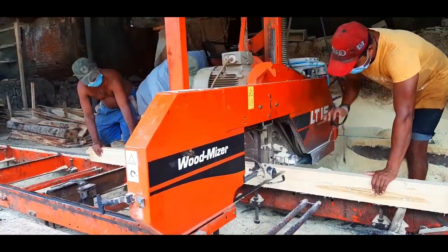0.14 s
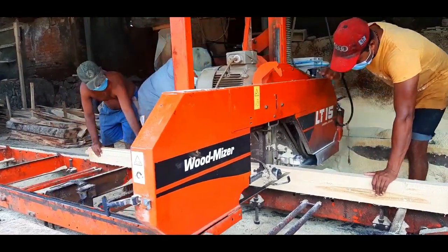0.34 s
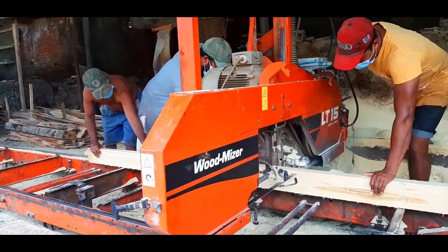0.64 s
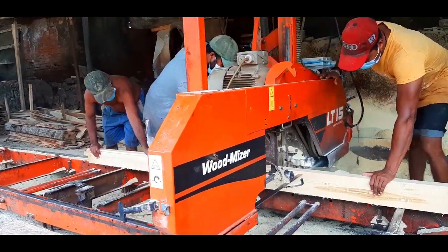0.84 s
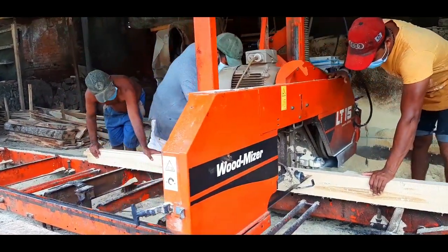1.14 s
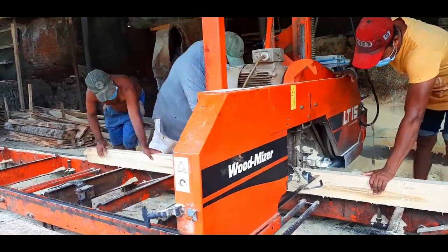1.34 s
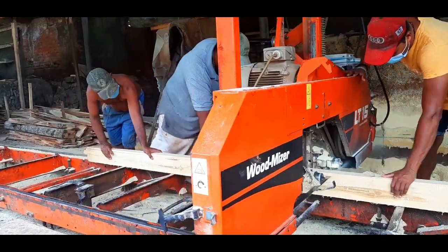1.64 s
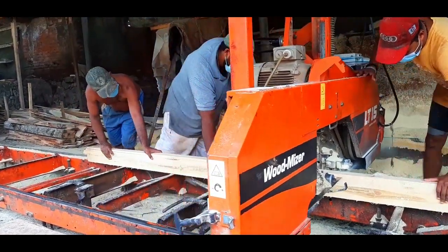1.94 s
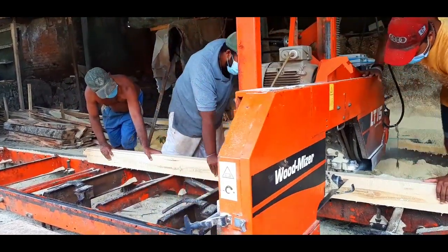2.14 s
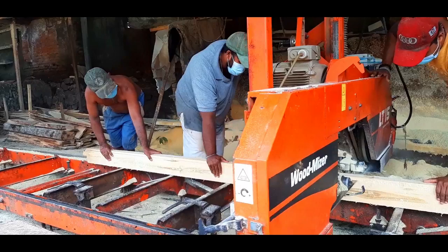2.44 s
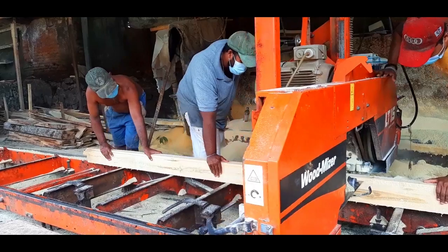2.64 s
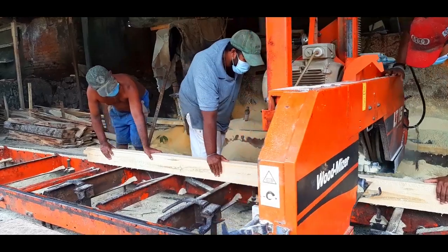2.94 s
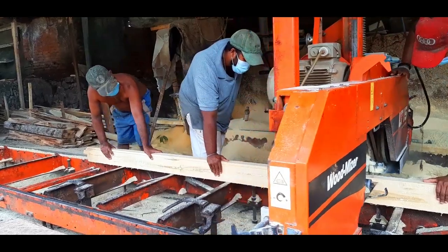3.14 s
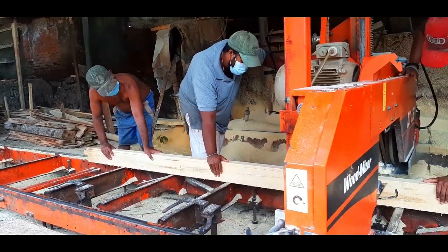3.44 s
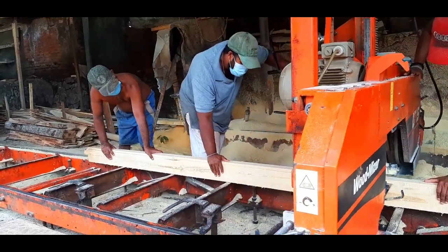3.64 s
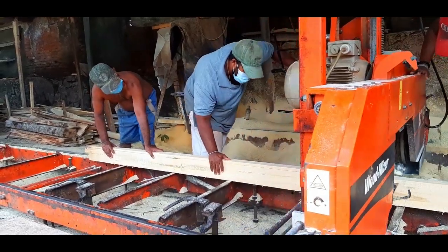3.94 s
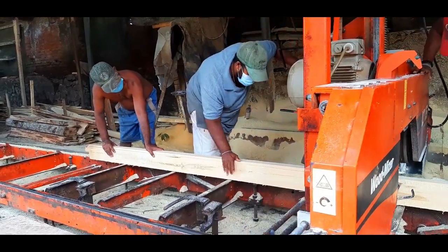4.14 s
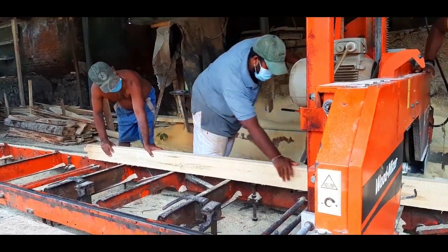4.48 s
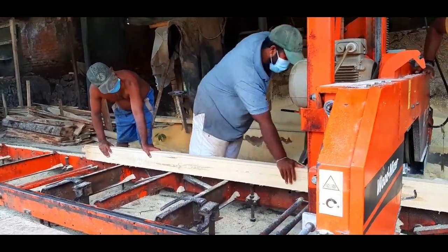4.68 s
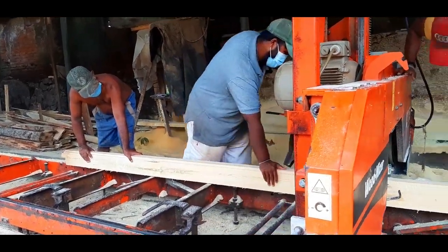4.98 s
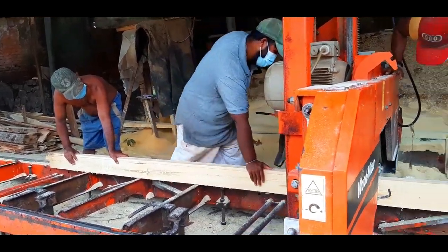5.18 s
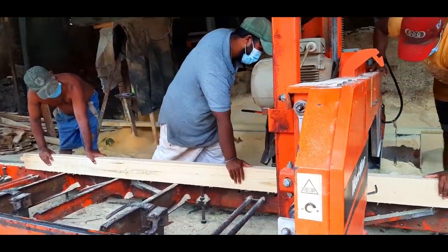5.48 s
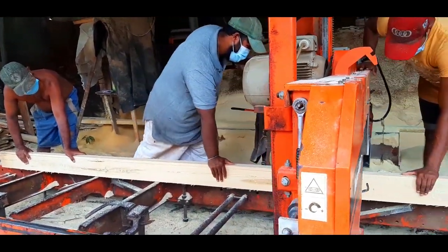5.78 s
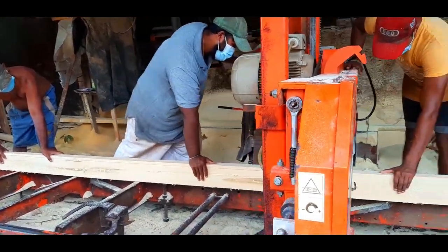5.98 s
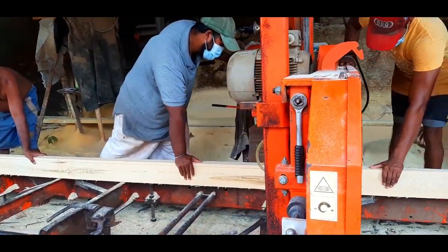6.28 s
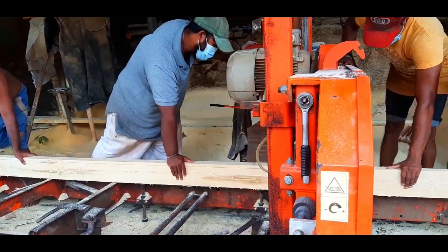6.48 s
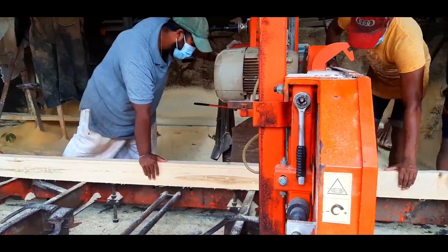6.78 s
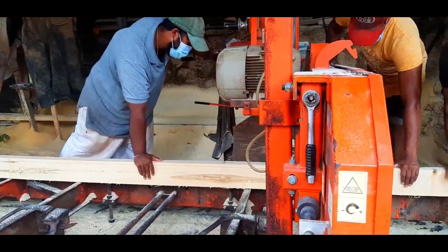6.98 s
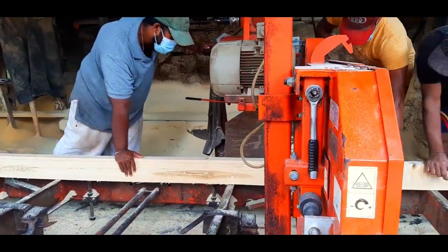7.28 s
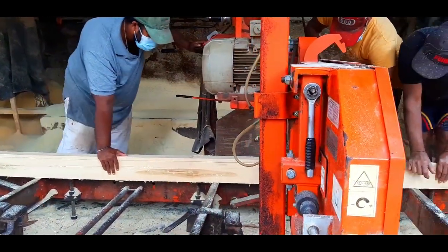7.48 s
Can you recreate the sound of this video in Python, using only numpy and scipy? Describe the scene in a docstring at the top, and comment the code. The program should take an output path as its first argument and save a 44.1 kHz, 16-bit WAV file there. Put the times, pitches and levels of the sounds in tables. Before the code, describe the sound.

A portable band sawmill runs steadily with a bright, buzzing hiss and a blade whine that swells and fades.

```python
"""A portable band sawmill runs in an open shed while a hand-held stereo microphone moves around it.
From the start the saw hisses, a guide roller and the band wheels repeat their own noise every turn,
the blade teeth whine and the motor and frame hum. Ringing tones come and go at loud spots.
Until 4.5 s the microphone turns away, so the sound reaches its left side later and later; then it
turns partway back. From about 6 s the whine is strong and beats more clearly against the roller."""
import sys
import numpy as np
from scipy import signal
from scipy.fft import irfft
from scipy.io import wavfile
from scipy.ndimage import uniform_filter1d, map_coordinates

SR = 44100
rng = np.random.default_rng(int(sys.argv[2]) if len(sys.argv) > 2 else 0)


def log_audio(samples):
    """Write samples as a 16-bit WAV file to the path given in sys.argv[1]."""
    # one column per channel
    frames = np.atleast_2d(samples).T
    # limit to full scale, then quantise
    limited = np.clip(frames, -1, 1)
    pcm = np.round(limited * 32767).astype(np.int16)
    wavfile.write(sys.argv[1], SR, pcm)


N = 336042
TIME = np.arange(N) / SR
TOOTH_HZ, ROLLER_HZ, WHEEL_HZ, LOOP_HZ = 847.3, 112.36, 12.55, 4.1  # teeth, turns, blade loops a second


def gain_of(db):
    return 10 ** (np.asarray(db) / 20)


def unit_rms(x):
    return x / np.sqrt(np.mean(abs(x) ** 2) + 1e-20)


def at_time(table, t=TIME):
    """Each value column of a table, read at times t."""
    times, *columns = np.transpose(table)
    return np.squeeze([np.interp(t, times, column) for column in columns])


def at_pitch(table, hz):
    f, value = np.transpose(table)
    return np.interp(np.log(hz + 1), np.log(f + 1), value)


def wander(rate):
    """A slow random drift, up to rate swings a second."""
    f = np.geomspace(.1 * rate, rate, num=16)[:, None]
    coarse = TIME[::256]
    slow = (np.sin(2 * np.pi * (f * coarse + rng.random((16, 1)))) / np.sqrt(f)).sum(0)
    return np.interp(TIME, coarse, unit_rms(slow))


def patches(shape, bins, frames):
    """Random blotches, bins wide in pitch and about frames long in time."""
    noise = uniform_filter1d(rng.standard_normal(shape), bins, axis=0)
    noise = uniform_filter1d(noise, frames, axis=1)
    return unit_rms(uniform_filter1d(noise, frames, axis=1))


def spinning_noise(turns, memory, strength, size):
    """A spinning part repeats its noise every turn; the pattern slowly changes over memory turns."""
    rows, keep = int(turns[-1]) + 2, np.exp(-1 / memory)
    a, b = rng.standard_normal((2, rows + 60, len(strength)))
    harmonics = signal.lfilter([1], [1, -keep], a + 1j * b, axis=0)[60:] * strength
    pattern = irfft(np.pad(harmonics, ((0, 0), (1, 0))), size, axis=1)
    pattern = np.hstack([pattern, pattern[:, :1]])
    return unit_rms(map_coordinates(pattern, [turns, turns % 1 * size], order=1))


# The roller's harmonics 1, 2, 3 ... before the tone is evened out: level/dB
ROLLER_HARMONICS = [-16, -34, -6.5, -42, -2, -15, 2.5, 2.5, -5.5, -5.5, -18, -10, -36, -40, -9.5, -20, -8,
                    -19, -3, 2, -25, 2, -20, 1, -14, 2, -7, -4, 1.5]
# The roller, then the wheels, compared with the hiss: f/Hz, level/dB
ROLLER_SHARE = [(300, -11.5), (1200, -3), (2500, -1), (4500, -1.5), (6500, -1), (10000, -4), (15000, -4)]
WHEEL_SHARE = [(100, -16), (250, -9), (500, -9.5), (1000, -8), (2500, -1.5), (6000, -43)]
# The tone colour of saw and microphone: f/Hz, level/dB
COLOUR = [(18, -35), (40, -24.5), (140, -20), (215, -8), (280, -7.5), (550, -5), (1260, -16), (1750, -6.5),
          (2100, -8.5), (4100, 1.5), (7250, -5), (8550, -12.5), (11500, -6.5), (15400, -10.5)]


def hiss_roller_wheels(roller_turns, knock, swell_db=3.6):
    """Hiss, roller buzz and wheel noise, mixed on a grid of pitch and time."""
    harmonics = gain_of(np.pad(ROLLER_HARMONICS, (0, 150 - len(ROLLER_HARMONICS))))
    hiss = rng.standard_normal(N) * knock
    roller = spinning_noise(roller_turns, 6.1, harmonics, size=2048) * knock
    wheels = spinning_noise(TIME * WHEEL_HZ, 7.1, np.ones(400), size=4096)
    hz, t, parts = signal.stft(np.array([hiss, roller, wheels]), SR, nperseg=2048, noverlap=1536)
    power = uniform_filter1d((abs(parts) ** 2).mean(2), size=41, axis=1)
    parts /= np.sqrt(power)[:, :, None] + 1e-9  # even out each part's tone
    swell = swell_db * patches(parts[1].shape, bins=6, frames=10)  # roller harmonics come and go
    parts[1] *= gain_of(swell - np.log(10) / 20 * swell_db ** 2)  # same power on average
    shares = gain_of([0 * hz, at_pitch(ROLLER_SHARE, hz), at_pitch(WHEEL_SHARE, hz)])
    shares *= hz < [[16500], [16500], [4800]]
    mix = (parts * shares[:, :, None]).sum(0) / (np.linalg.norm(shares, axis=0)[:, None] + 1e-9)
    return hz, t, mix * gain_of(at_pitch(COLOUR, hz))[:, None]


# Drifting strips of high hiss: start t/s, end t/s, from f/Hz, to f/Hz, width/Hz, level/dB
HISS_BANDS = [(-2, 1.1, 11300, 11000, 400, -2.5), (-1.5, 1.3, 11400, 11400, 440, 4.5),
              (1.4, 2.3, 14800, 15000, 1100, 5.5), (1.2, 2.7, 10550, 10100, 300, 6),
              (2, 2.25, 11400, 12000, 310, 4.5), (2.8, 2.5, 12000, 14300, 500, 6.5),
              (4, 2.3, 12500, 12000, 300, 8), (1.5, 6, 8700, 8300, 300, 3.5),
              (3.5, 4.76, 11250, 11200, 500, 6), (1, 5.2, 15000, 14000, 550, 4),
              (3, 5.3, 7200, 7500, 330, 3.5), (4, 4.5, 11300, 12200, 660, 1.5),
              (2.5, 5.2, 12800, 13000, 400, 5), (5.5, 6.6, 7450, 7700, 200, 5.5),
              (4, 7, 13700, 15000, 400, 4.5), (6, 6.9, 11700, 11800, 400, 3.5),
              (6, 3.7, 12300, 12300, 320, 8), (5, 7.2, 13000, 13600, 370, 6.5),
              (6.4, 7.7, 6500, 6900, 250, -2), (12, 8, 11400, 11400, 400, 4)]


def hiss_bands_db(hz, t):
    """Strips of the hiss brighten (a few dim) for a while as they drift in pitch."""
    out = np.zeros((len(hz), len(t)))
    for start, end, from_hz, to_hz, width_hz, db in HISS_BANDS:
        progress = np.clip((t - start) / (end - start), 0, 1)
        centre = from_hz + (to_hz - from_hz) * progress
        swell = np.sqrt(np.sin(np.pi * progress).clip(0))
        out += db * swell * np.exp(-2 * ((hz[:, None] - centre) / width_hz) ** 2)
    return out


# Boost of the deepest noise: t/s, level/dB
RUMBLE = [(0, 2), (2, 3), (3.6, 4), (4.6, 2.5), (5.3, 2), (5.8, -1), (7.62, -0.5)]


def rumble_db(hz, t, below_hz=160):
    """The rumble under the hums grows, then eases off."""
    return at_time(RUMBLE, t) / (1 + (hz[:, None] / below_hz) ** 6)


# Seven pitch ranges: from f/Hz, to f/Hz, centre f/Hz
RANGES = [(170, 800, 500), (900, 1600, 1250), (1750, 3100, 2400), (3100, 7500, 4500), (7500, 9500, 8500),
          (9500, 12500, 11000), (12500, 15700, 14000)]
# Their loudness: level/dB, then how much each follows the walk's low, middle, high and top levels
RANGE_LEVELS = [(-43.5, 2.1, 0, 0.28, 0.33), (-39.5, 2.14, 0.33, 0.45, 0), (-38.5, 0.93, 0.31, 0, 0.08),
                (-28, 0, 1, 0.14, 0.04), (-32.5, 0.017, 0.55, 0.71, 0.04), (-23, 0.48, 0.65, 0.6, 0.63),
                (-20.5, 0.051, 0, 0, 0.57)]


def loudness_db(mix, hz, walk_db):
    """The boost that brings each pitch range to its loudness as the microphone moves."""
    power = (abs(mix) ** 2).mean(1) * 2 / 1.5  # 1.5 allows for the window's width
    now = 10 * np.log10([power[(hz > low) & (hz < high)].sum() for low, high, _ in RANGES])
    wanted = np.array(RANGE_LEVELS) @ [np.ones(mix.shape[1]), *walk_db]
    blend = np.array([np.interp(np.log(hz + 1), np.log(RANGES)[:, 2], row) for row in np.eye(len(RANGES))])
    return blend.T @ (wanted - now[:, None])


def shimmer_db(shape, hz, treble, streak_db=1.2, patch_db=.8, glint_db=2.7, flutter_db=1.2):
    """Ringing plates and echoes streak the treble; short glints of metal dot the middle."""
    streaks = streak_db * patches(shape, bins=9, frames=36) + patch_db * patches(shape, bins=50, frames=60)
    flicker = .74 * patches(shape, bins=300, frames=6)
    middle = np.exp(-.5 * (np.log(hz / 4000 + 1e-9) / 1.48) ** 2)[:, None]
    glints = glint_db * patches(shape, bins=5, frames=9)
    flutter = flutter_db * patches(shape, bins=70, frames=4)
    spread = (middle * glint_db) ** 2 + treble ** 2 * (streak_db ** 2 + patch_db ** 2)
    # the last term keeps the average power about the same
    return treble * (streaks + flicker) + middle * (glints + flutter) - np.log(10) / 20 * spread


# The head start that the microphone's housing gives its left side: f/Hz, lead/rad
HOUSING_LEAD = [(2500, -1.5), (5000, 0.02), (10000, 0.22), (11200, 2.1), (12200, 0.9), (13700, 3.5),
                (14500, 1.5), (14900, 4), (15700, 2)]
# The microphone's walk: t/s, left delay/us, then low, middle, high and top level/dB
WALK = [(0, 37, 0.81, 1.5, -2.5, -5), (.5, 54, -0.27, 2.1, -4, -3), (1.1, 77.6, -0.26, -1.5, 0.5, 0),
        (1.5, 92, -0.31, -0.5, 1, -1.5), (2.0, 114.4, 0, 1.4, -1.5, 0.5), (2.4, 125, -0.32, 0.41, -2.5, 0),
        (3.0, 153.4, -0.27, -0.7, 1, -1.5), (3.6, 175, -1.3, -0.4, 1.5, 3.5),
        (4.0, 184, -1.8, -2.1, 1.5, 2.5), (4.5, 199, -1.5, -0.2, -2, 0.5),
        (5.05, 187, -0.38, 1, -4.5, -2.5), (5.5, 145, -0.63, -0.7, 0, -1), (5.9, 153, 0, 1, -3, 2),
        (6.3, 125, 0.73, 0, -3, 0.5), (6.701, 128, 1.7, -2, -1.5, -4.5), (7.0, 162, 1.4, 1, -3.5, -2),
        (7.3, 155, 1.3, -0.5, -3, -2.5), (7.62, 137, 2.2, 2.8, -4.5, -1)]


def left_lead(hz, t):
    """How far the wave is ahead on the left, in radians: housing minus travel time."""
    delay_s = at_time(WALK, t)[0] / 10 ** 6
    aimed = np.clip((hz - 1550) / (2770 - 1550), 0, 1)  # lower sound comes from all round the shed
    return aimed * (at_pitch(HOUSING_LEAD, hz) - 2 * np.pi * hz * delay_s)


# Stereo width, the noise opposite on the two sides against the noise they share: f/Hz, level/dB
WIDTH = [(30, -3), (60, -6), (110, -10), (200, -13.5), (380, -10), (700, -7.5), (1290, -3), (2380, 0),
         (4400, -1), (8120, -3.5), (10000, -1.5), (11500, -6.5), (15000, -5)]
# Left minus right: f/Hz, level/dB
BALANCE = [(60, 0), (240, 0), (950, 1), (3770, -1), (15000, -1.5)]


def running_saw():
    """The saw's noise on both sides of the moving microphone."""
    roller_turns = np.cumsum(ROLLER_HZ * (1 + .001253 * wander(8))) / SR
    # flat spots on the roller knock the blade a few times each turn
    knock = 1 + sum(depth * np.cos(2 * np.pi * (k * roller_turns + rng.random()))
                    for k, depth in enumerate((.077, .03, .023, .025, .02), start=1))
    layers = []
    for is_opposite in (False, True):
        hz, t, mix = hiss_roller_wheels(roller_turns, knock)
        mix *= gain_of(hiss_bands_db(hz, t) + rumble_db(hz, t))
        walk_db = at_time(WALK, t)[1:]
        treble = np.clip((hz / 11500) ** 4.3, 0, 1)[:, None]
        top_db = treble * walk_db[-1]
        width = gain_of(at_pitch(WIDTH, hz)[:, None] - .85 * top_db)  # a louder top is narrower
        share = (width if is_opposite else 1) / np.sqrt(1 + width ** 2)
        mix *= gain_of(loudness_db(mix, hz, walk_db) + shimmer_db(mix.shape, hz, treble))
        layers.append(mix * share)
    shared, opposite = layers
    pan_db = at_pitch(BALANCE, hz)[:, None] - .3 * top_db
    lean = gain_of(pan_db / 2) * np.exp(.5j * left_lead(hz[:, None], t))
    pair = np.array([(shared + opposite) * lean, (shared - opposite) / lean])
    return signal.istft(pair, SR, nperseg=2048, noverlap=1536)[1][:, :N]


def rough_tone(hz, fuzz, width_hz, t=TIME):
    """A tone roughened by a narrow band of noise around its pitch."""
    keep = np.exp(-np.pi * width_hz / SR)
    a, b = rng.standard_normal((2, len(t)))
    noise = unit_rms(signal.lfilter([1], np.convolve([1, -keep], [1, -keep]), a + 1j * b))
    return unit_rms(1 + fuzz * noise) * np.exp(2j * np.pi * (hz * t + rng.random()))


def in_stereo(tone, level_db, pan_db, lead):
    """One tone on both sides: the left is pan_db louder and lead radians ahead."""
    lean = gain_of(pan_db / 2) * np.exp(.5j * lead)
    return np.sqrt(2) * gain_of(level_db) * np.real([tone * lean, tone / lean])


# The whine through the shed's loud and quiet spots (standing waves), then its octave: t/s, level/dB
WHINE = [(0, -34.5), (.4, -36), (.55, -47), (1.04, -54), (1.5, -50), (1.75, -43.5), (1.97, -34.5),
         (2.3, -37), (2.68, -42), (2.8, -55), (3.05, -38), (3.4, -79), (3.9, -49), (4.6, -47), (5.1, -37),
         (5.4, -34), (5.6, -36), (5.95, -46.5), (6.01, -39.5), (6.4, -32.5), (6.65, -37.5), (6.85, -44),
         (7.05, -31), (7.62, -42)]
OCTAVE = [(0, -33.5), (.33, -38), (.42, -44), (.55, -38), (.75, -46), (.95, -32), (1.08, -30.5),
          (1.22, -32.5), (1.36, -36), (1.42, -47), (1.62, -38), (1.85, -33), (2.1, -33.5), (2.2, -38),
          (2.4, -47), (2.65, -34), (2.95, -37), (3.16, -35), (3.25, -39), (3.42, -39.5), (3.6, -42),
          (4.03, -43.5), (4.5, -49), (4.97, -44), (5.5, -54), (5.73, -56), (5.95, -42), (6.3, -41),
          (6.6, -41), (6.75, -36.5), (6.95, -32.5), (7.15, -33.5), (7.43, -35.5), (7.62, -34.5)]
# The roller's 15th harmonic compared with the octave: t/s, level/dB
BEAT = [(0, -15), (5.6, -15), (6.1, -6), (6.6, -8), (7.0, -7), (7.62, -8)]
# Head start on the left: t/s, whine lead/rad, octave lead/rad
TEETH_LEAD = [(0, 0.5, 0.66), (.5, 0, 2), (1.1, 4, 0.96), (1.65, 0.5, 0.5), (2.1, 0.3, 0.46),
              (2.6, 0.5, 0.77), (3.1, 4, 1.4), (4.6, 0.5, 1.4), (5.2, 0, 0.75), (6.0, 0.8, 1.1),
              (6.5, -0.2, 2), (6.8, 1.1, 4.5), (7.05, 2.5, 4.5), (7.35, 3.5, 5.3), (7.62, 5, 4.5)]


def blade_teeth(pan_db=1):
    """Passing teeth make a nearly pure whine and a fluttering octave; both throb once per blade loop."""
    whine_lead, octave_lead = at_time(TEETH_LEAD)
    octave_db = at_time(OCTAVE)
    throb = 1 + .08 * np.cos(2 * np.pi * LOOP_HZ * TIME)
    whine = in_stereo(rough_tone(TOOTH_HZ, .2, 16), at_time(WHINE), pan_db, whine_lead)
    octave = in_stereo(rough_tone(2 * TOOTH_HZ, .22, 30), octave_db, pan_db, octave_lead)
    # this roller tone lies 9 Hz under the octave, so the two beat
    beat = in_stereo(rough_tone(15 * ROLLER_HZ, .6, 25), octave_db + at_time(BEAT), pan_db, octave_lead)
    return throb * (whine + octave) + beat


# Single ringing tones: start t/s, end t/s, f/Hz, level/dB, left lead halfway through/rad
RINGS = [(0.0, 0.7, 3937.0, -36.3, -2.23), (0.0, 0.84, 1127.0, -50.1, -0.39),
         (0.0, 0.86, 4612.0, -41.4, -2.31), (0.0, 0.72, 4048.0, -33.5, -2.53),
         (0.8, 1.3, 4048.0, -41.0, -2.53), (0.07, 1.23, 1461.0, -47.6, 0.24),
         (0.14, 0.63, 4950.0, -41.7, -1.44), (0.16, 1.53, 3597.0, -39.7, -2.76),
         (0.51, 2.79, 4830.0, -41.8, -2.98), (0.6, 1.5, 289.4, -53.3, 0.03),
         (0.81, 2.46, 4943.0, -41.2, -2.88), (0.88, 1.79, 1125.0, -48.1, 0.16),
         (1.09, 3.18, 3706.0, -39.0, 3.12), (1.21, 1.83, 4493.0, -40.6, 3.13),
         (1.5, 2.6, 289.4, -48.6, -0.12), (1.56, 2.37, 2919.0, -45.7, -2.62),
         (1.72, 2.32, 5281.0, -41.0, -2.69), (1.76, 2.44, 4044.0, -38.0, 2.0),
         (1.95, 2.3, 3258.0, -40.5, -0.48), (1.97, 2.72, 3593.0, -42.1, 2.48),
         (2.09, 3.72, 5057.0, -39.5, 0.83), (2.1, 2.7, 1798.0, -47.9, 0.99),
         (2.14, 3.53, 5617.0, -41.7, 0.49), (2.1, 3.55, 4497.0, -32.2, 1.01),
         (2.3, 3.2, 1618.0, -51.0, 0.34), (2.6, 3.9, 289.4, -50.4, -0.22),
         (2.93, 4.41, 1126.0, -51.3, 0.21), (3.0, 3.46, 3824.0, -39.6, 2.84),
         (3.2, 3.55, 4614.0, -38.1, 0.4), (3.65, 4.3, 2029.0, -45.7, -1.58),
         (3.75, 5.5, 2812.0, -41.5, 1.84), (3.8, 4.5, 2700.0, -45.6, 0.88),
         (3.97, 5.53, 2255.0, -49.8, 0.15), (4.37, 5.87, 1462.0, -51.3, 0.59),
         (4.55, 5.13, 5067.0, -40.2, 1.86), (4.57, 5.18, 4056.0, -40.5, 2.73),
         (4.6, 5.4, 2700.0, -41.9, 1.04), (4.81, 5.57, 3482.0, -43.3, 0.52),
         (4.85, 5.83, 786.0, -48.7, -0.11), (4.9, 6.7, 565.2, -52.3, -0.34),
         (5.27, 5.85, 4155.0, -40.3, 1.15), (5.35, 5.75, 3257.0, -41.9, -0.66),
         (5.5, 7.64, 347.2, -57.3, -0.02), (5.8, 6.92, 4492.0, -39.1, 2.04),
         (6.2, 7.0, 1869.0, -47.1, -0.47), (6.39, 7.55, 3388.0, -44.5, -0.13),
         (6.5, 7.13, 2357.0, -48.3, -1.18), (6.57, 7.43, 2539.0, -46.6, 2.25),
         (6.8, 7.3, 1798.0, -46.1, -1.36), (6.83, 7.64, 1458.0, -46.7, -0.25),
         (6.99, 7.64, 3592.0, -39.3, 0.85), (7.0, 7.64, 1869.0, -43.5, -0.18),
         (7.01, 7.64, 4040.0, -39.9, 2.61), (7.06, 7.52, 4487.0, -40.2, -2.69),
         (7.08, 7.64, 5385.0, -40.6, 1.9)]


def ringing_tones():
    """Tones swell and fade as the microphone passes loud spots; higher ones are rougher."""
    out = np.zeros((2, N + SR))
    for start, end, hz, db, mid_lead in RINGS:
        at = round(max(start - .1, 0) * SR)
        t = np.arange(round((end + .1076) * SR) - at) / SR
        tone = rough_tone(hz, .22 + hz / 11000, hz / 80, t) * signal.windows.tukey(len(t), .45)
        lead = mid_lead + left_lead(hz, at / SR + t) - left_lead(hz, (start + end) / 2)
        out[:, at:at + len(t)] += in_stereo(tone, db, pan_db=-2.5 * min(hz / 4000, 1), lead=lead)
    return out[:, :N]


# Low tones of the motor, wheels and frame: f/Hz, level/dB
HUMS = [(211.3, -71.5), (226.1, -61.5), (235.5, -56), (239.6, -55), (247.6, -63), (282.6, -64.5),
        (289.4, -66), (314.9, -59.5), (339.1, -68.5), (347.2, -56), (407.8, -62.5), (508.7, -60),
        (565.2, -67), (693.1, -60.5)]


def hums():
    """Motor, wheels and frame hum throughout, wavering a little."""
    out = np.zeros((2, N))
    for hz, db in HUMS:
        tone = np.exp(1j * (2 * np.pi * (hz * TIME + rng.random()) + .5 * wander(3)))
        out += in_stereo(tone, db + 2.2 * wander(1.5), pan_db=.5, lead=.12 * wander(.6))
    return out


def scene():
    return running_saw() + blade_teeth() + ringing_tones() + hums()


def record(dry):
    """Cut away the very highest treble."""
    lowpass = signal.firwin(4095, cutoff=15735, window=("kaiser", 10), fs=SR)
    return signal.oaconvolve(dry, lowpass[None], "same")


dry = scene()
out = record(dry)
log_audio(out)
```